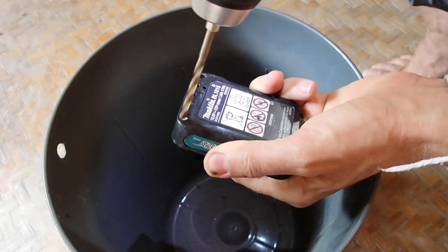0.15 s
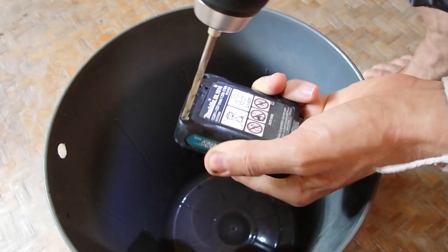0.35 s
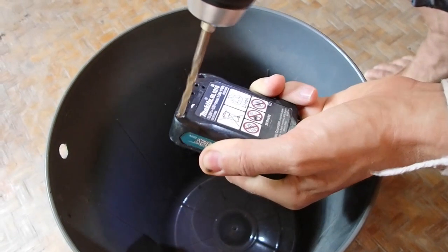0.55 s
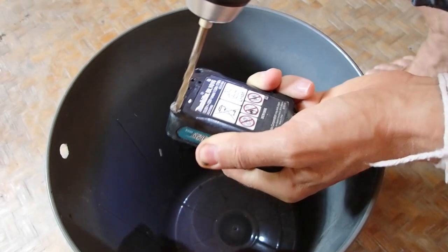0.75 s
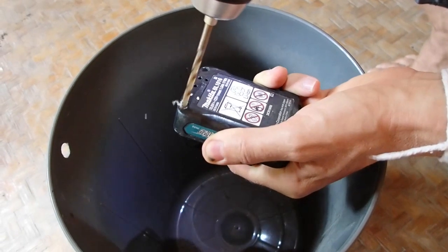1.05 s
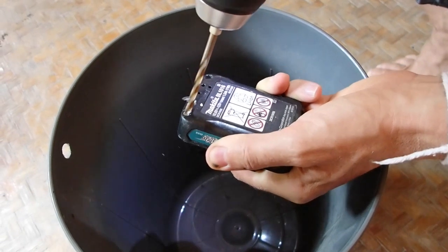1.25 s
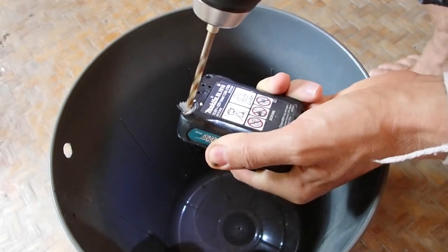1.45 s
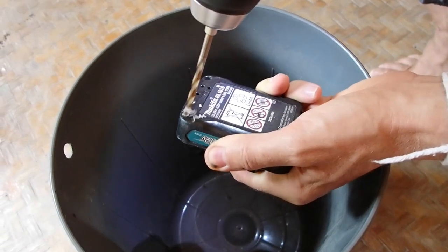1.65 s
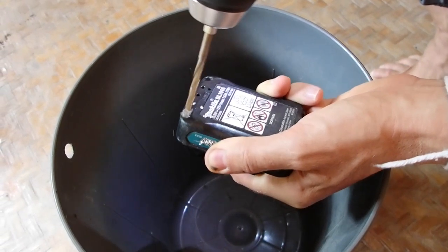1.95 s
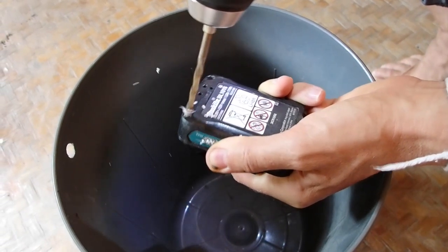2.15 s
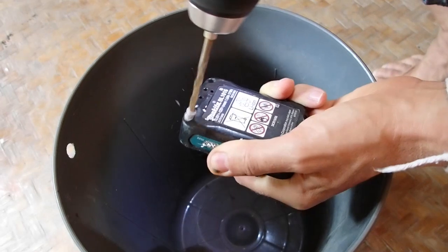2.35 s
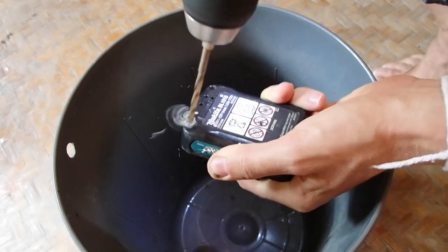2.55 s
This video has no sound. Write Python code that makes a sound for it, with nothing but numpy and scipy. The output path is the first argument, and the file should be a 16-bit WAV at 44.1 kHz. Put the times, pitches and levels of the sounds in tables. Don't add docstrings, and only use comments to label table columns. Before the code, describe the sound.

A cordless drill bores into plastic, its motor whining over hissing, rattling gears. It turns slowly at first, leaps to full speed around 0.3-0.45 s, holds, then winds down from 0.8 to 1.3 s with small clicks. A weak squeeze growls until 1.7 s, then it surges high, dips near 2.1 s and sags after 2.45 s. Close and bright right, muffled left, with low rumble and soft basin thumps.

```python
import sys
import numpy as np
from scipy import signal
from scipy.fft import rfft, irfft
from scipy.io import wavfile
from scipy.ndimage import uniform_filter1d

SR = 44100
rng = np.random.default_rng(int(sys.argv[2]) if len(sys.argv) > 2 else 0)


def invert_db(level):
    return 10 ** (np.asarray(level, dtype=float) / 20)


def file_out(sig):
    cols = np.atleast_2d(sig).T
    lim = np.clip(cols, -1, 1)
    pcm = np.round(lim * 32767).astype(np.int16)
    wavfile.write(sys.argv[1], SR, pcm)


N = 119070

FAR_LOWS_DB = 7


def rms_one(x):
    return x / np.sqrt(np.mean(x ** 2) + 1e-20)


def in_time(rows):
    s, *cols = np.transpose(rows)
    return [np.interp(np.arange(N) / SR, s, c) for c in cols]


def at_hz(points, hz):
    p = np.array(points, float)
    return np.interp(np.log(hz + 1), np.log(p[:, 0] + 1), p[:, 1])


def drift(rate_hz):
    r = np.exp(-2 * np.pi * rate_hz / SR)
    noise = rng.standard_normal(N + SR)
    settled = signal.lfilter([1], [1, -2 * r, r * r], noise)[SR:]
    return rms_one(settled)


def colour(x, gain_at):
    return irfft(rfft(x) * gain_at(np.arange(N // 2 + 1) * SR / N), N)


def motor_speed():
    # (time [s], speed [turns/s])
    slow_start = [(0, 203), (.125, 205), (.16, 219), (.2, 225), (.25, 230), (.27, 240), (.303, 242)]
    # (time [s], speed [turns/s])
    first_run = [(.32, 270), (.342, 352), (.37, 412), (.41, 441), (.46, 448), (.78, 444), (.86, 422),
                 (1.0, 353), (1.2, 247), (1.28, 197)]
    # (time [s], speed [turns/s])
    second_run = [(1.35, 158), (1.36, 172), (1.38, 197), (1.41, 213), (1.46, 224.5), (1.55, 229),
                  (1.6, 222), (1.65, 202), (1.71, 167)]
    # (time [s], speed [turns/s])
    third_run = [(1.72, 177), (1.737, 226), (1.752, 290), (1.775, 372), (1.8, 418), (1.83, 436),
                 (1.87, 446.5), (2.03, 444)]
    # (time [s], speed [turns/s])
    eased_run = [(2.081, 435.8), (2.135, 407.3), (2.17, 431), (2.211, 444.2), (2.28, 447.7), (2.409, 444.1),
                 (2.48, 423), (2.55, 387.6), (2.7, 306)]
    speed = in_time(slow_start + first_run + second_run + third_run + eased_run)[0]
    return uniform_filter1d(speed, size=350)


def whine(speed, phase, slope):
    multiples = [1, 4, 8, 10, 12, 16, 20, 32]
    # (speed [turns/s], level [dB rms])
    levels = [
        [(160, -89), (230, -51.5), (270, -60), (340, -41.5), (410, -37.5), (445, -40)],
        [(160, -35.5), (205, -34.5), (240, -30.5), (280, -30), (325, -29), (380, -39), (445, -71)],
        [(170, -54), (207, -34.5), (228, -26.5), (250, -31), (290, -33), (350, -44), (412, -24), (445, -17.5)],
        [(240, -65), (290, -46), (340, -42), (395, -37), (420, -34.5), (440, -42)],
        [(170, -50), (205, -38), (225, -35), (280, -40), (330, -50), (445, -47)],
        [(165, -44), (205, -30.5), (228, -22.5), (255, -22.5), (275, -23), (292, -31), (312, -46), (445, -60)],
        [(165, -38), (185, -31), (205, -26), (220, -31), (238, -36), (255, -46), (445, -65)],
        [(200, -43), (230, -35), (250, -57), (445, -80)],
    ]
    # (speeding up [dB], wrenched up [dB], coasting slowly [dB],
    # coasting fast [dB], speed parting slow from fast [turns/s])
    drive = [(1.5, 0, -1, 0, 222), (0, 0, -1, 0, 260), (-1.5, 0, 2, -6, 360), (0, 0, 6, 13, 250),
             (0, 0, -6, 2, 222), (4.5, -1.5, -10, -3, 213), (-2.5, 12, -20, -30, 222),
             (0, 0, -12, -12, 222)]
    settle_s = .12
    pull = np.clip(slope / 1000, 0, 1.2)
    wrench = np.clip(slope / 1400 - 1, 0, 1)
    coast = np.clip(-slope / 250, 0, 1)
    step = 1 / (settle_s * SR)
    late_coast = signal.lfilter([step], [1, step - 1], coast)
    tones = 0
    for k, level, (pull_db, wrench_db, slow_db, fast_db, parting) in zip(multiples, levels, drive):
        slow = 1 / (1 + np.exp((speed - parting) / 6))
        slack = late_coast if k == 10 else coast
        flutter_db = 1.8 if k == 1 else 1.1
        level_db = at_hz(level, speed) + pull_db * pull + wrench_db * wrench
        level_db = level_db + slack * (slow_db * slow + fast_db * (1 - slow))
        level_db = level_db + flutter_db * drift(21.6)
        tones = tones + np.sqrt(2) * invert_db(level_db) * np.sin(k * phase)
    return tones


def housing_db(hz):
    # (frequency [Hz], width [Hz], gain [dB])
    shell = [(610, 92, -4), (1388, 144, 6), (2050, 72, 3), (2476, 187, -10), (4450, 410, 5),
             (6710, 580, -9.5), (7550, 490, 2.5), (9370, 2100, -11), (12940, 2200, 9), (14900, 830, 15.5)]
    return sum(db / (1 + (2 * (hz - f) / w) ** 2) for f, w, db in shell)


def gear_hiss(speed, phase):
    # (frequency [Hz], density [dB per Hz])
    slow_hiss = [(150, -54), (250, -17.5), (1360, -12), (2240, -7.5), (4390, -3), (6640, -6), (7630, 0.5),
                 (9380, -14.5), (15500, -36.5)]
    # (frequency [Hz], density [dB per Hz])
    fast_hiss = [(150, -76), (250, -41), (442, -18.5), (657, -15), (3270, -5), (3450, -12), (3820, -8.5),
                 (7630, -4.5), (15500, -40.5)]
    slow_db, fast_db, blend_speed = 7, 6.5, 380
    planet = phase / 5
    throb = 1 + .12 * np.sin(phase) + .1 * (np.sin(planet) + np.sin(2 * planet))
    grain = throb * invert_db(1 * drift(200))

    def hiss(spectrum):
        def gain(hz):
            low_cut = hz ** 4 / (hz ** 4 + 250 ** 4)
            return invert_db(at_hz(spectrum, hz) + housing_db(hz)) * low_cut
        return rms_one(colour(grain * rng.standard_normal(N), gain))

    fast = 1 / (1 + np.exp((blend_speed - speed) / 40))
    slow_part = invert_db(slow_db) * np.sqrt(1 - fast) * hiss(slow_hiss)
    return slow_part + invert_db(fast_db) * np.sqrt(fast) * hiss(fast_hiss)


def ring(clicks):
    # (frequency [Hz], level [dB], t60 [s])
    modes = [(1350, -12, .008), (3000, -9, .004), (4150, -2, .005), (4700, -1, .004), (5600, -7, .003),
             (7650, -7, .005), (12500, -23, .002)]
    out = 0
    for hz, db, t60 in modes:
        r = invert_db(-60 / (t60 * SR))
        w = 2 * np.pi * hz / SR
        struck = clicks * rng.normal(1, 1.0, N) + 1e-18
        out = out + signal.lfilter([0, invert_db(db) * np.sin(w)], [1, -2 * r * np.cos(w), r * r], struck)
    return signal.sosfilt(signal.butter(2, 800, "high", fs=SR, output="sos"), out)


def rattle():
    slaps_per_s, spread_db = 900, 3.5
    size = invert_db(spread_db * np.minimum(rng.exponential(1, N), 4)) * rng.choice([-1, 1], N)
    chance = slaps_per_s * invert_db(4 * drift(15)) / SR
    return rms_one(ring(size * (rng.random(N) < chance)))


def kicks():
    # (time [s], level [dB])
    knocks = [(1.3512, -4), (.3067, -7), (1.3209, -14), (1.7245, -10), (2.0926, -13), (2.5975, -8),
              (2.6643, -7), (1.7006, -14), (1.0782, -4), (1.0015, -5), (1.022, -6), (1.1, -7)]
    clicks = np.zeros(N)
    bounce_s = np.array([0, .0005, .0012])
    for s, db in knocks:
        clicks[(SR * (s + bounce_s)).astype(int)] = invert_db(db - 7) * np.array([1, -.8, .6])
    return ring(clicks) + .4 * np.diff(clicks, prepend=0)


def far_microphone(x):
    # (frequency [Hz], gain [dB])
    shadow = [(250, -8), (600, -11), (1400, -17.5), (3100, -23), (5900, -20), (8400, -21.5), (11800, -25.5),
              (15300, -34)]
    # (frequency [Hz], width [Hz], gain [dB])
    hollows = [(3550, 500, -10), (4150, 600, -20), (4850, 500, -3), (6550, 400, -4), (9100, 500, -2),
               (12800, 1100, -4)]
    # (frequency [Hz], phase [rad])
    turn = [(20, 0), (340, -1.2), (2840, -1.7), (3530, -2.7), (4130, -1.2), (4570, .7), (5500, -.4),
            (7670, -1.3), (15200, -3.2)]
    # (frequency [Hz], share [0-1])
    direct_share = [(300, .75), (1500, .75), (3600, .85), (6000, .35), (9000, .15), (12000, .1)]
    diffuse_t60_s = .14
    t = np.arange(N) / SR
    scatter = rfft(rng.standard_normal(N) * invert_db(-60 * t / diffuse_t60_s))
    scatter = scatter / np.sqrt(uniform_filter1d(np.abs(scatter) ** 2, size=800))

    def path(hz):
        hollow_db = sum(db / (1 + (2 * (hz - f) / w) ** 4) for f, w, db in hollows)
        share = np.clip(at_hz(direct_share, hz), 0, 1)
        direct = np.sqrt(share) * np.exp(1j * at_hz(turn, hz))
        return invert_db(at_hz(shadow, hz) + hollow_db) * (direct + np.sqrt(1 - share) * scatter)

    return colour(x, path)


def rumble(speed):
    # (frequency [Hz], density [dB per Hz])
    spectrum = [(12, -43), (20, -31), (75, 21.5), (226, 20.5), (277, -13.5), (300, -22), (390, -37),
                (660, -120)]

    def gain(hz):
        return invert_db(at_hz(spectrum, hz)) / (1 + (hz / 350) ** 4) * (hz > 15)

    lows = [rms_one(colour(rng.standard_normal(N), gain)) for _ in range(2)]
    level_db = -47 + 2.5 * (-1.5 - speed / 330) * 2 + 3.4 * drift(5.2)
    return np.array(lows) * invert_db(level_db) * invert_db(np.array([[FAR_LOWS_DB], [0]]))


def thumps():
    # (time [s], level [dB])
    knocks = [(0.031, -48), (.14, -54), (.27, -51), (.92, -55), (1.1, -50), (1.28, -47), (1.36, -45),
              (1.47, -43), (1.57, -55)]
    width_s, corner_hz = .021, 108
    t = np.arange(N) / SR
    shape = sum(invert_db(db) * np.exp(-((t - s) / width_s) ** 2) for s, db in knocks)

    def gain(hz):
        return hz ** 3 / (hz ** 3 + 60 ** 3) / (1 + (hz / corner_hz) ** 2)

    lows = [rms_one(colour(rng.standard_normal(N), gain)) for _ in range(2)]
    return np.array(lows) * shape * invert_db(np.array([[FAR_LOWS_DB], [0]]))


def scene():
    # (time [s], hiss level [dB], rattle share [dB])
    load = [(0, -23, -6), (.29, -23, 0), (.33, -17.5, -14), (.4, -17, -5), (.45, -20, -7.5),
            (.75, -22, -14), (1.05, -20, -7.5), (1.348, -27.5, 1), (1.352, -20.5, -11.5), (1.59, -23, -4),
            (1.63, -25, -2), (1.716, -24.5, -7), (1.735, -16, -11), (1.86, -17, -10), (1.9, -20, -11.5),
            (2.07, -21.5, -11), (2.16, -19, -26), (2.7, -23, 3.5)]
    speed = motor_speed()
    slope = uniform_filter1d(np.gradient(speed) * SR, size=400)
    phase = 2 * np.pi * np.cumsum(speed * (1 + .001 * drift(27.4))) / SR
    load_db, slack_db = in_time(load)
    gears = invert_db(load_db) * (gear_hiss(speed, phase) / 2 + invert_db(slack_db) * rattle())
    near = 2 * (whine(speed, phase, slope) + gears + kicks())
    near = signal.sosfilt(signal.butter(4, 170, "high", fs=SR, output="sos"), near)
    return np.array([far_microphone(near), near]) + rumble(speed) + thumps()


def low_pass(x):
    return signal.sosfilt(signal.butter(12, 15630, fs=SR, output="sos"), x)


def record(dry):
    top = 1.22
    mix = np.clip(top * np.tanh(dry / top), -1, 1)
    return low_pass(mix)


dry = scene()
out = record(dry)
file_out(out)
```